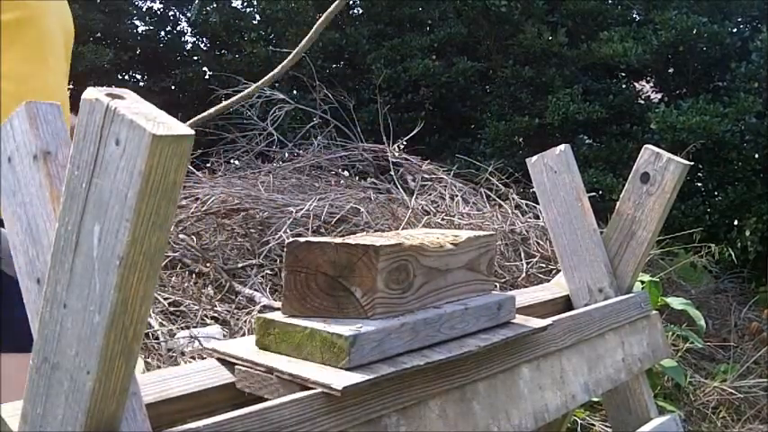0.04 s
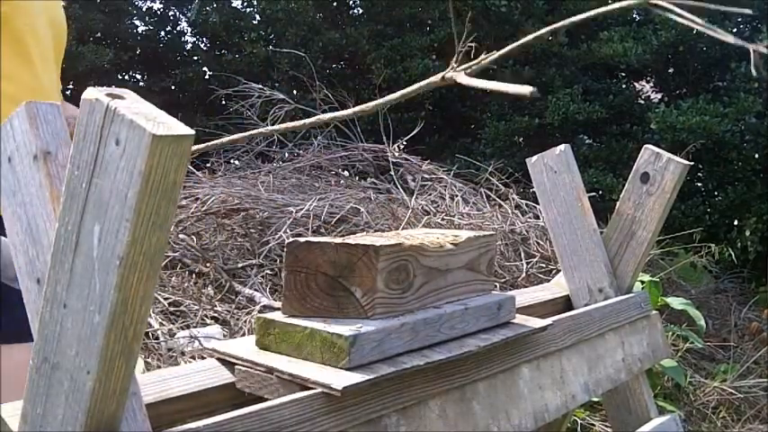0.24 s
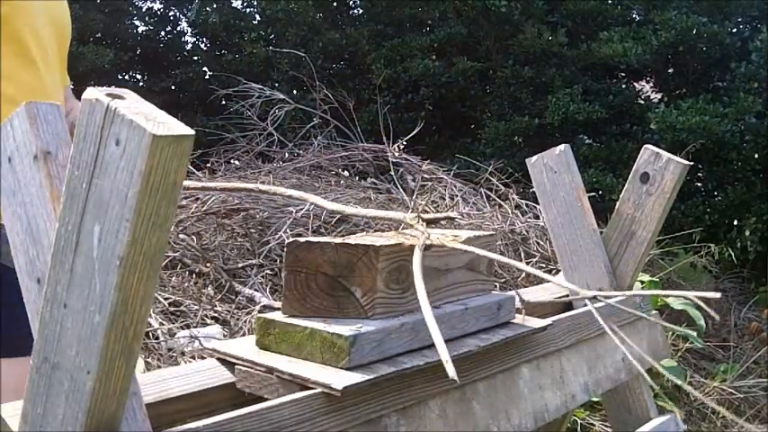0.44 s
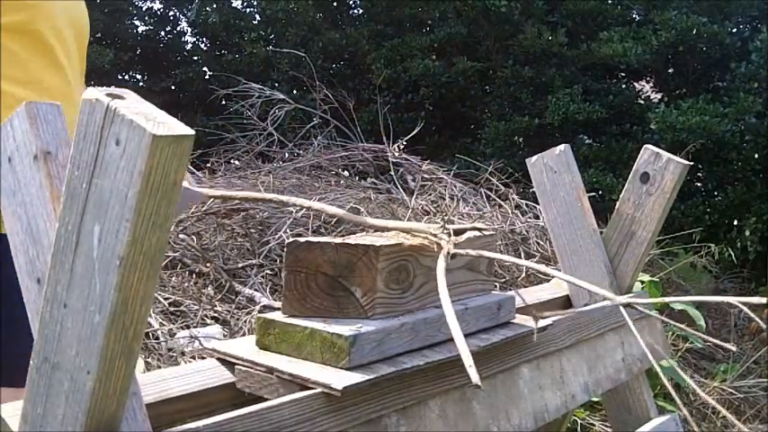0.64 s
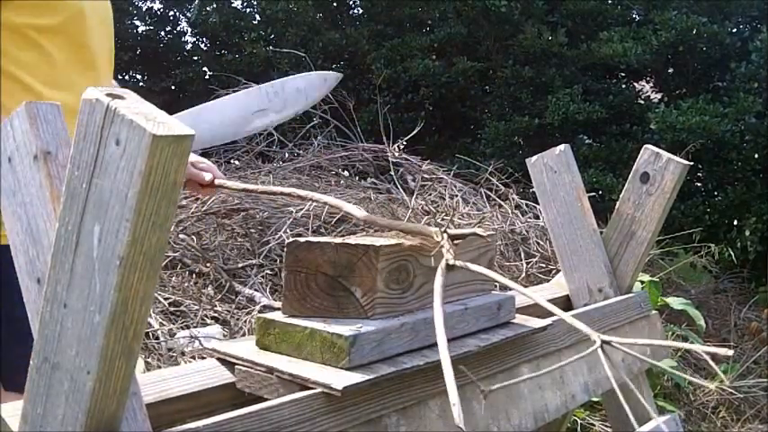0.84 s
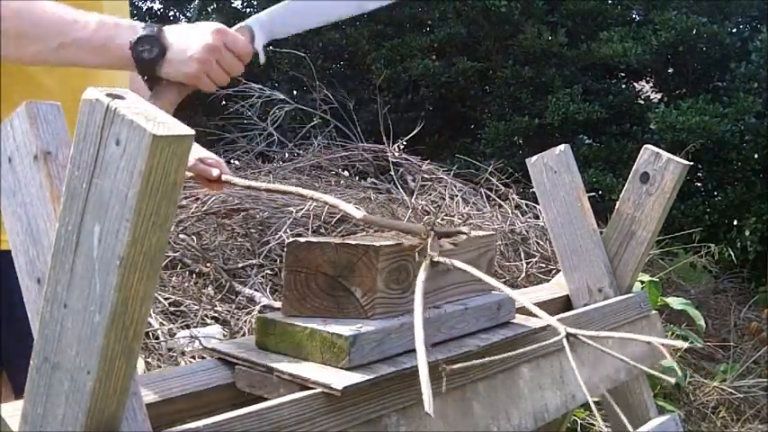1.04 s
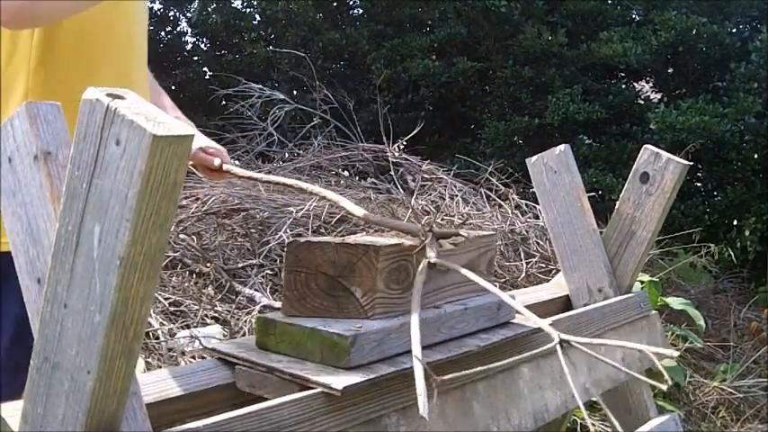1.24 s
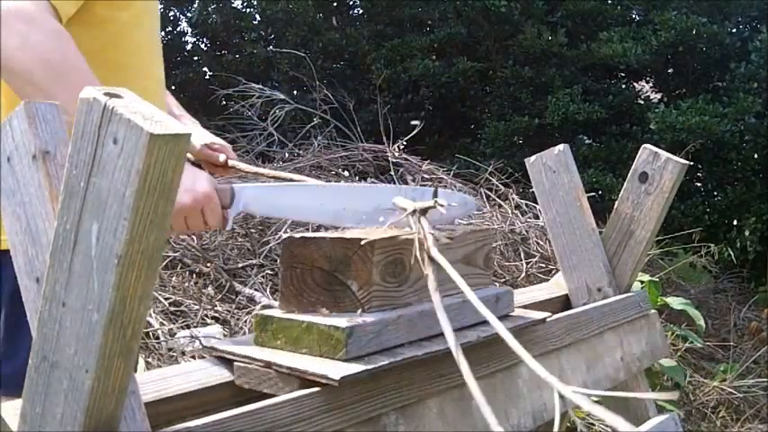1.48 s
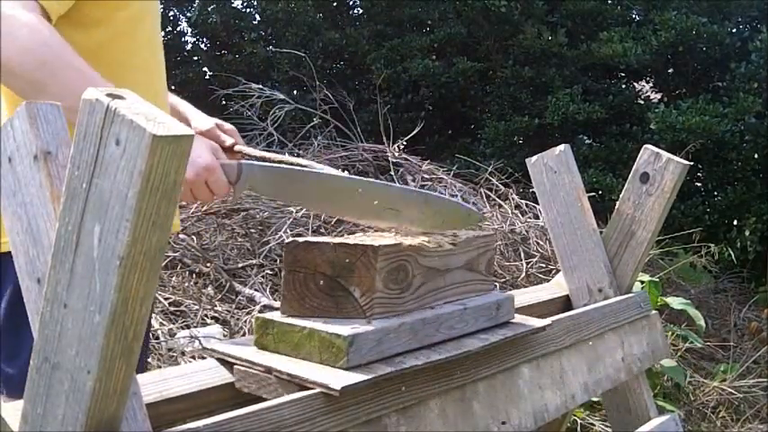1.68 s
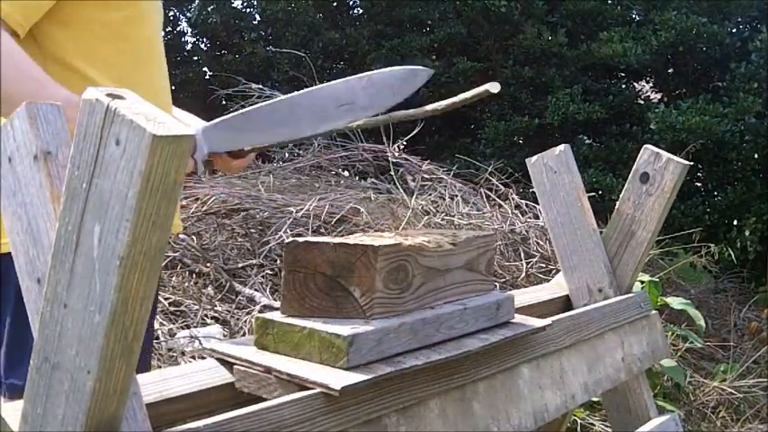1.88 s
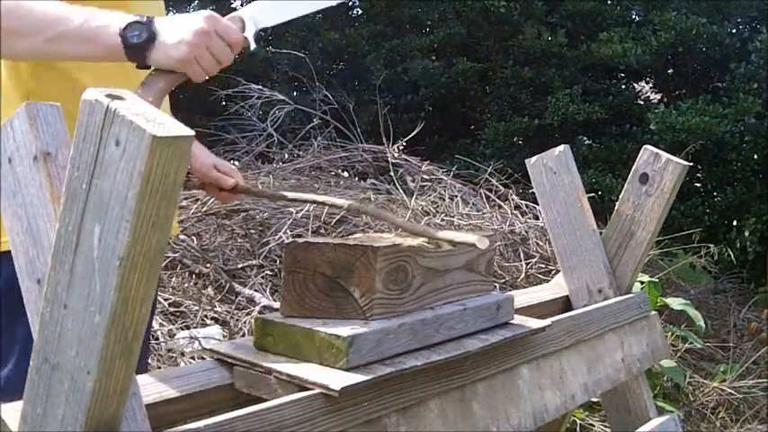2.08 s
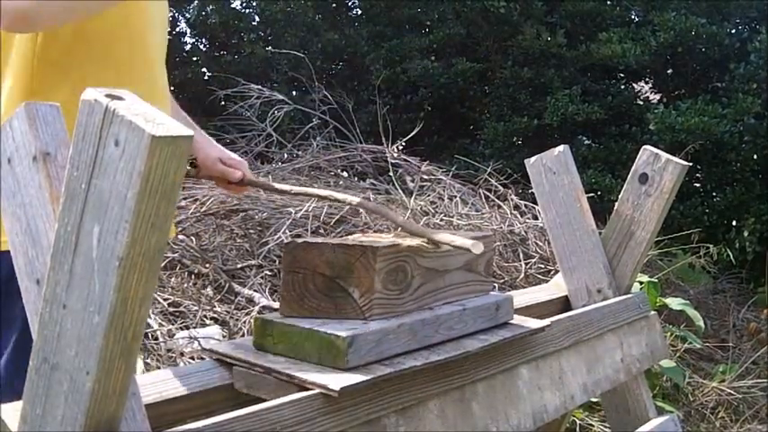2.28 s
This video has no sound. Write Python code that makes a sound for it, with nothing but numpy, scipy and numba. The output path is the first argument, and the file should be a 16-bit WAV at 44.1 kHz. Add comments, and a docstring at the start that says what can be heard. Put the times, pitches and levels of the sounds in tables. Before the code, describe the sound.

A large knife chops a dry stick once outdoors, followed by softer wooden knocks.

```python
"""One loud chop outdoors: a large knife cuts through a dry stick on a wooden block.
Fibres crack, wood and blade ring, and the yard echoes dully. Twigs tick, the block rocks on its boards,
the stand shudders and the stick is clacked down again. Leaves rustle and a far bird whistles over
steady air and a machine hum. A limiter ducks the level after each loud blow."""
import sys
import numpy as np
from scipy import signal
from scipy.fft import rfft, irfft, next_fast_len
from scipy.io import wavfile
from scipy.ndimage import uniform_filter1d
from numba import njit

SR = 44100
rng = np.random.default_rng(int(sys.argv[2]) if len(sys.argv) > 2 else 0)


def transcribe(u):
    """Save the signal u as a 16-bit wav file named by the first command-line argument.

    u: samples, shape (n,) or (channels, n), limited to [-1, 1]; the rate is SR.
    q: integer samples, one column per channel.
    """
    v = np.clip(np.atleast_2d(u).T, -1, 1)
    q = np.round(v * 32767).astype(np.int16)
    wavfile.write(sys.argv[1], SR, q)


N = 102135
T = np.arange(N) / SR

# stick pressed on the block (frequency [Hz], level [dB], t60 [s])
WOOD_MODES = [(135, -5, .05), (452, 8, .055), (637, 9, .045), (717, 5, .05), (979, 9, .045), (1320, 3, .03),
              (1444, 4, .04), (1932, 2, .03), (2061, 5, .03), (2252, 4, .03), (2547, 6, .032),
              (2793, 2, .03), (3737, 4, .028), (4178, 6, .024)]


def undb(db):
    """Decibels to gain."""
    return 10 ** (np.asarray(db) / 20)


def envelope(points):
    """Gain through (time [s], level [dB]) points, silent before the first."""
    return undb(np.interp(T, *np.array(points).T, left=-200))


def shape(x, gain):
    """Filter by a gain that is a function of frequency."""
    size = next_fast_len(len(x) + 2048)
    hz = np.fft.rfftfreq(size, 1 / SR) + 1
    return irfft(rfft(x, size) * gain(hz), size)[:len(x)]


def lowpass(x, cutoff_hz, order=4):
    """Zero-phase treble cut."""
    return shape(x, lambda f: 1 / (1 + (f / cutoff_hz) ** order))


def bell(f, centre_hz, width_oct):
    """Gaussian on a pitch axis."""
    return np.exp(-.5 * (np.log2(f / centre_hz) / width_oct) ** 2)


def noise(spectrum, size=N):
    """Unit-rms noise coloured by (frequency [Hz], level [dB]) points."""
    hz, db = np.array(spectrum).T
    x = shape(rng.standard_normal(size), lambda f: undb(np.interp(np.log(f), np.log(hz), db)))
    return x / x.std()


def drift(rate_hz):
    """Smooth random drift of unit spread."""
    step = int(SR / rate_hz)
    stairs = np.repeat(rng.standard_normal(N // step + 1), step)
    x = uniform_filter1d(stairs, step)[:N]
    return x / x.std()


def decay(t60_s, size, contact_s=0.0004):
    """Quick rise during contact, then exponential decay."""
    return (1 - np.exp(-T[:size] / contact_s)) * np.exp(-np.log(1000) * T[:size] / t60_s)


def ring(modes, size=16384):
    """Decaying modes after one blow, neighbours opposite in sign."""
    return sum((-1) ** k * undb(db) * np.sin(2 * np.pi * hz * T[:size]) * decay(t60_s, size)
               for k, (hz, db, t60_s) in enumerate(modes))


def burst(spectrum, t60_s, damping=0, size=16384):
    """Decaying noise; damping shortens the treble."""
    x = noise(spectrum, size)
    low = lowpass(x, cutoff_hz=2500)
    return low * decay(t60_s, size) + (x - low) * decay(t60_s * np.exp(-damping), size)


def place(events):
    """Sum (time [s], sound) pairs on the time line."""
    out = np.zeros(N)
    for time_s, sound in events:
        i = int(np.clip(time_s * SR, 0, N - 1))
        out[i:i + len(sound)] += sound[:N - i]
    return out


def strike(blows, modes, grit, grit_t60_s, grit_db):
    """Each blow rings the wood and adds a short rough crack."""
    return place((time_s, undb(db) * (ring(modes) + undb(grit_db) * burst(grit, grit_t60_s)))
                 for time_s, db in blows)


def chop():
    """Fibres crack; the steel rings as the edge bites, the wood as the stick snaps."""
    # edge bites, stick snaps, blade meets block (time [s], relative level [dB])
    stages = [(1.5694, -1.5), (1.5715, -3.5), (1.5764, -1)]
    # splitting fibres (frequency [Hz], relative level [dB])
    crack_spectrum = [(60, -1), (200, -1.5), (500, -18), (1500, 0.5), (3000, -2), (5500, -1.5),
                      (6900, -8.5), (7800, -24), (9000, -33), (11000, -20.5), (16000, -23)]
    # (frequency [Hz], level [dB], t60 [s])
    blade_modes = [(3321, -28, .15), (3973, -10, .16), (5033, -20, .12), (5744, -29, .15)]
    crack_db, wood_db = 9, 2.5
    bite_s, snap_s = stages[0][0], stages[1][0]
    cracks = place((time_s, undb(db + crack_db) * burst(crack_spectrum, t60_s=0.039, damping=0.88))
                   for time_s, db in stages)
    return cracks + place([(bite_s, ring(blade_modes)), (snap_s, undb(wood_db) * ring(WOOD_MODES))])


def yard_echo():
    """Ground, brush pile and trees return the chop as a dulled ring and diffuse noise."""
    # (arrival [s], level [dB])
    echoes = [(1.582, -3), (1.617, -14), (1.657, -10.5), (1.692, -21), (1.719, -20), (1.748, -24.5)]
    # scattered sound (frequency [Hz], relative level [dB])
    spectrum = [(100, -3), (250, -6.5), (460, 1), (750, -4.5), (950, 0.5), (1300, -9), (2500, -16),
                (4500, -22.5), (7000, -38), (15000, -80)]
    dull_ring = undb(-4.5) * lowpass(ring(WOOD_MODES), cutoff_hz=1140)
    return place((time_s, undb(db) * (dull_ring + burst(spectrum, t60_s=0.2, damping=0.091)))
                 for time_s, db in echoes)


def block_knocks():
    """The block rocks and knocks on its boards."""
    # (time [s], level [dB])
    knocks = [(1.981, -25.5), (1.9865, -27.5), (2.0225, -14), (2.0302, -3), (2.0515, -10), (2.1265, -7.5),
              (2.139, -17), (2.174, -22), (2.275, -25.5), (2.291, -25)]
    # block and boards (frequency [Hz], level [dB], t60 [s])
    modes = [(144, -20.5, 0.082), (285.4, -5.5, 0.088), (363, -7, 0.078), (448, -14, 0.18),
             (583, -2.5, 0.096), (617.4, -3, 0.089), (745, -13, 0.09), (856, -18, 0.15),
             (1039, -11.5, 0.047)]
    # contact noise (frequency [Hz], relative level [dB])
    grit = [(40, -5), (150, -8), (350, 11), (700, -5), (1050, -6), (1500, -31), (3000, -24), (7000, -39),
            (15000, -69)]
    return strike(knocks, modes, grit, grit_t60_s=0.084, grit_db=-9)


def stick_clacks():
    """The shortened stick lands on the block, chatters and bounces."""
    # (time [s], level [dB])
    clacks = [(2.0899, -4), (2.0918, -6), (2.0947, -7.5), (2.1075, -17), (2.1105, -25)]
    # shortened stick (frequency [Hz], level [dB], t60 [s])
    modes = [(852, 0.5, 0.052), (1035, 0.5, 0.036), (1220, -0.5, 0.037), (1610, -9, 0.029),
             (1850, -4.5, 0.015), (2236, 4.5, 0.028), (2560, -8, 0.019), (2875, 1, 0.015),
             (4250, -13, 0.014), (5360, -12, 0.011)]
    # contact noise (frequency [Hz], relative level [dB])
    grit = [(80, 4), (400, -12), (1000, 2.5), (2500, 2), (4000, -4.5), (6000, -7), (8000, -30.5),
            (15000, -31)]
    return strike(clacks, modes, grit, grit_t60_s=0.024, grit_db=-1)


def stand_shudder():
    """The wooden stand shudders with a low rumble."""
    # (time [s], level [dB])
    shudder = [(1.92, -47.5), (1.99, -35), (2.04, -31.5), (2.12, -20), (2.19, -24), (2.25, -32),
               (2.29, -27.5), (2.32, -36)]
    # (frequency [Hz], relative level [dB])
    rumble_spectrum = [(25, -11), (60, -3), (115, 1), (200, -6), (400, -0.5), (600, -7), (900, -8),
                       (1400, -21.5), (3000, -23.5), (6000, -29.5), (15000, -77)]
    return envelope(shudder) * noise(rumble_spectrum)


def twig_ticks():
    """Dry twigs tick and crackle, each at its own pitch, with the highest modes dulled."""
    # (time [s], level [dB], pitch [Hz], t60 [s], relative crackle level [dB])
    taps = [(.0047, -16, 3040, 0.007, -1), (0.5269, -33.5, 4620, 0.037, 7),
            (0.5283, -29.5, 2704, 0.033, 4.5), (.544, -38, 3120, 0.038, 1),
            (0.707, -38.5, 3020, 0.071, -0.5), (1.9141, -16, 2966, 0.025, -8),
            (1.9161, -15.5, 4810, 0.029, -7.5), (1.9254, -27, 4400, 0.035, -2),
            (1.9474, -24, 3090, .04, 0.5), (1.9702, -22.5, 5300, .03, 1), (2.0034, -23.5, 4440, 0.048, 1),
            (2.0227, -17, 4470, 0.029, -1), (2.030, -20, 3720, 0.052, -3),
            (2.2228, -26.5, 3810, 0.032, -0.5), (2.272, -35.5, 3950, .03, -4.5),
            (2.299, -26.5, 5310, 0.028, -3), (2.309, -26, 3620, 0.025, -3)]
    # twig (frequency [x pitch], level [dB], t60 [x tap t60])
    modes = [(0.841, -7.5, 1), (1.002, -1, 1), (1.121, -7.5, 1), (1.298, -5, 1), (1.66, -2, 0.33)]
    # (frequency [Hz], relative level [dB])
    crackle_spectrum = [(200, -18), (1700, 7), (2800, 7), (6000, 5), (7400, -5), (8600, -3.5), (10000, -14),
                        (16000, -8.5)]

    def tick(hz, t60_s, crackle_db):
        tone = ring([(ratio * hz, db, share * t60_s) for ratio, db, share in modes])
        crackle = shape(burst(crackle_spectrum, t60_s), lambda f: bell(f, hz, width_oct=1.12))
        return lowpass(tone, cutoff_hz=6200, order=8) + undb(crackle_db) * crackle
    return place((time_s, undb(db) * tick(hz, t60_s, crackle_db))
                 for time_s, db, hz, t60_s, crackle_db in taps)


def leaf_rustle():
    """Leaves and twigs brush along grainily; blade and branch scrape briefly."""
    # (time [s], relative level [dB])
    brushing = [(0, -51), (.36, -58), (.58, -58), (.65, -45.5), (.8, -48), (.9, -52.5), (1.0, -56.5),
                (1.07, -46), (1.19, -48), (1.26, -73), (1.78, -46), (1.84, -40.5), (1.9, -44.5),
                (2.03, -34.5), (2.2, -49), (2.32, -52)]
    # (frequency [Hz], relative level [dB])
    leaf_spectrum = [(300, 6), (1500, -1), (2200, 4.5), (4300, 0.5), (6500, -7.5), (9000, -29.5),
                     (15000, -21)]
    # (peak time [s], half length [s], level [dB], centre [Hz], width [oct])
    scrapes = [(1.197, 0.013, -44.5, 1950, 0.34), (1.866, 0.0059, -34, 2560, 0.12),
               (1.881, 0.012, -34.5, 1870, 0.66)]
    grain_db = 2
    out = envelope(brushing) * noise(leaf_spectrum) * undb(grain_db * (drift(rate_hz=300) - 0.5))
    for time_s, half_s, db, hz, width_oct in scrapes:
        band = shape(rng.standard_normal(N), lambda f: bell(f, hz, width_oct))
        swell = np.exp(-.5 * ((T - time_s) / half_s) ** 2)
        out += undb(db) * swell * band / band.std()
    return out


def bird():
    """A far bird whistles faint gliding notes."""
    # (time [s], length [s], start pitch [Hz], end pitch [Hz], level [dB])
    notes = [(.115, 0.035, 3210, 2450, -49), (.215, 0.08, 2600, 3530, -48.5), (.31, 0.11, 3600, 3080, -56),
             (.405, 0.032, 3150, 2900, -50), (.455, .03, 3250, 2900, -50), (.595, 0.032, 2920, 3260, -49),
             (.905, 0.036, 2900, 3280, -49)]

    def whistle(length_s, start_hz, end_hz):
        size = int(length_s * SR)
        phase = 2 * np.pi * np.cumsum(np.geomspace(start_hz, end_hz, size)) / SR
        return np.sin(phase) * np.sin(np.linspace(0, np.pi, size))
    return place((time_s, undb(db) * whistle(length_s, start_hz, end_hz))
                 for time_s, length_s, start_hz, end_hz, db in notes)


def ambience():
    """Steady air and hiss over the wavering hum of a distant machine."""
    # (frequency [Hz], relative level [dB])
    air_spectrum = [(15, -31), (25, -30), (43, 1), (76, -10), (114, -1), (153, -11), (242, -8), (317, -13),
                    (476, -13), (1230, -18), (2990, -19), (8140, -38), (9320, -34.5), (14800, -32.5),
                    (16000, -47)]
    # (frequency [Hz], level [dB])
    hum_tones = [(52, -57.5), (119, -56.5), (248, -55.5)]
    air_db, swell_db, waver_rad = -44.5, 0.1, 0.57
    hum = sum(undb(db) * np.sin(2 * np.pi * hz * T + waver_rad * drift(rate_hz=10.05))
              for hz, db in hum_tones)
    return noise(air_spectrum) * undb(air_db + swell_db * drift(rate_hz=6.65)) + hum


@njit
def follow_peak(x, limit, attack_s, hold_s, release_db_per_s):
    """Peak follower: fast rise, hold, then a steady fall to the limit."""
    attack = 1 - np.exp(-1 / (attack_s * SR))
    release = 10 ** (-release_db_per_s / SR / 20)
    out, peak, wait = np.empty(len(x)), limit, 0.
    for i in range(len(x)):
        if abs(x[i]) > peak:
            peak += attack * (abs(x[i]) - peak)
            wait = hold_s * SR
        elif wait > 0:
            wait -= 1
        else:
            peak = max(limit, peak * release)
        out[i] = peak
    return out


def scene():
    """All sources at one microphone."""
    wood = chop() + yard_echo() + twig_ticks() + block_knocks() + stick_clacks() + stand_shudder()
    return (wood + leaf_rustle() + bird() + ambience())[None]


def record(dry):
    """Limiter, overload clipping, the microphone's treble notch and a steep top cut."""
    limit, notch_db, top_hz = 0.54, -12, 15400
    peak = follow_peak(dry[0], limit, attack_s=0.00035, hold_s=0.046, release_db_per_s=99.5)
    limited = np.clip(dry[0] * limit / peak, -1, 1)
    notched = shape(limited, lambda f: undb(notch_db * bell(f, centre_hz=7875, width_oct=0.094)))
    top_cut = signal.ellip(8, .2, 70, top_hz, fs=SR, output="sos")
    return signal.sosfilt(top_cut, notched)[None]


dry = scene()
out = record(dry)
transcribe(out)
```